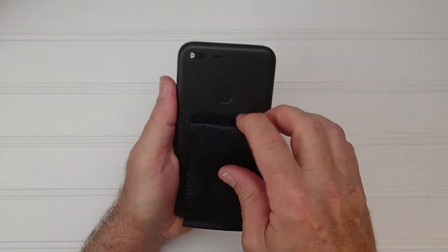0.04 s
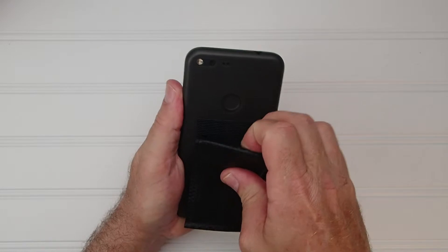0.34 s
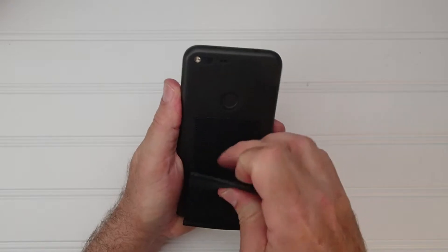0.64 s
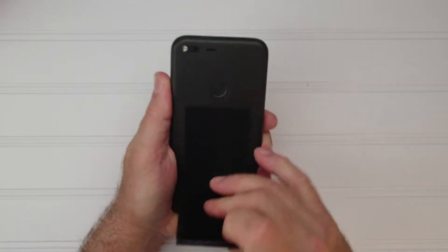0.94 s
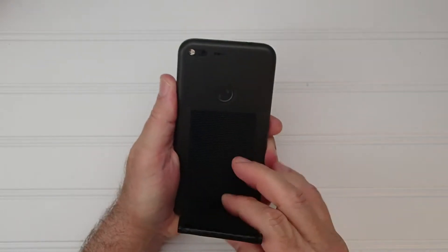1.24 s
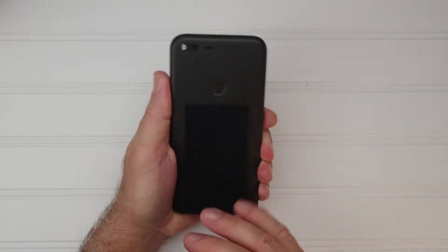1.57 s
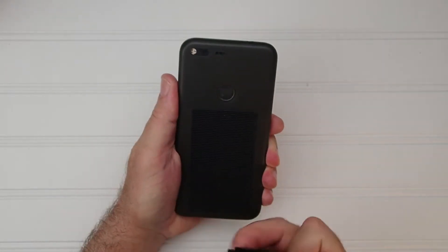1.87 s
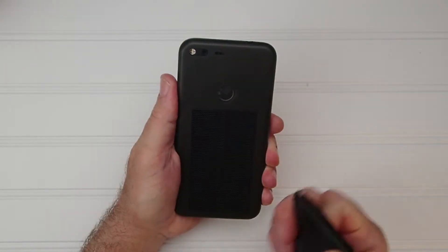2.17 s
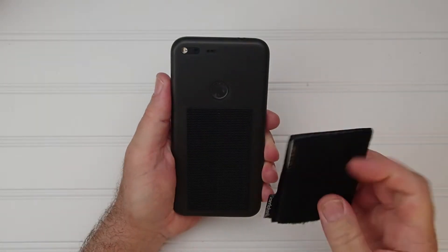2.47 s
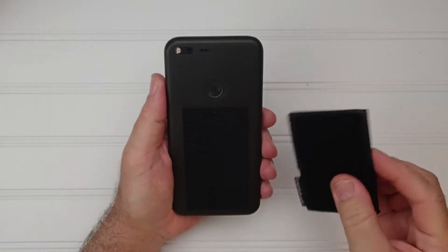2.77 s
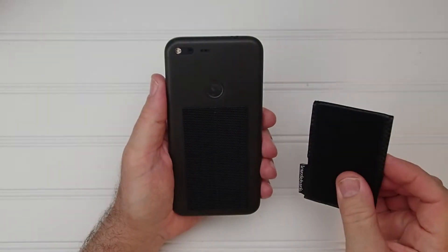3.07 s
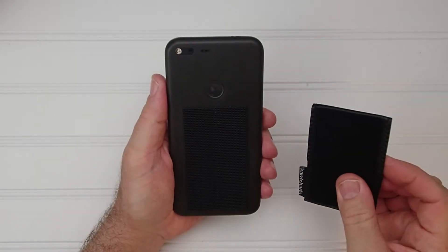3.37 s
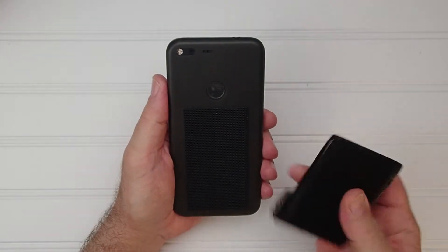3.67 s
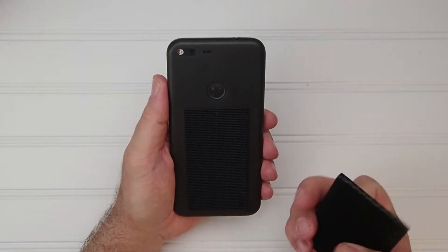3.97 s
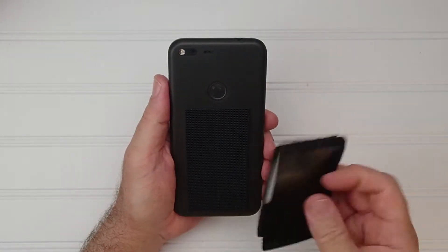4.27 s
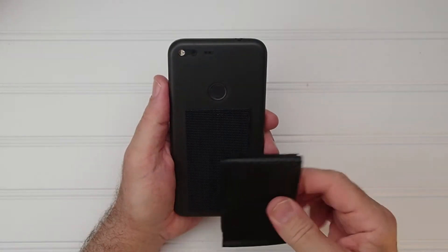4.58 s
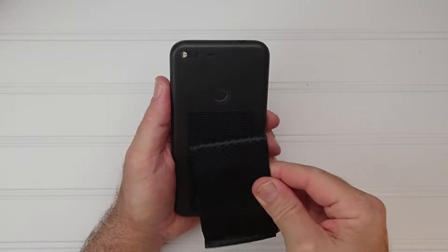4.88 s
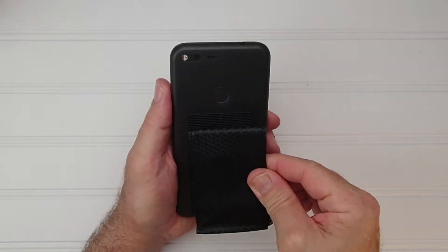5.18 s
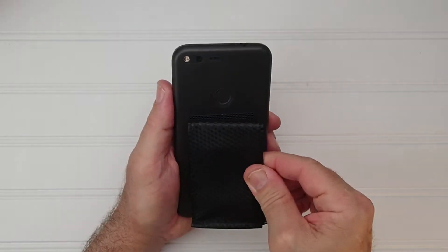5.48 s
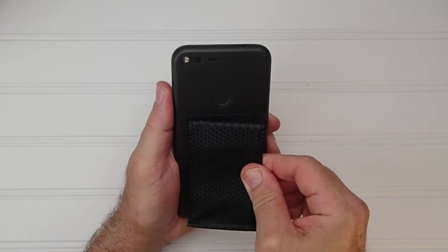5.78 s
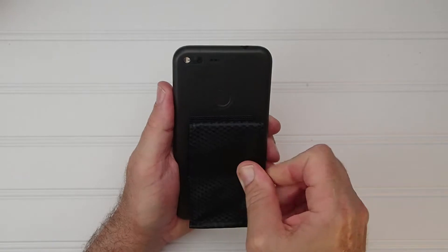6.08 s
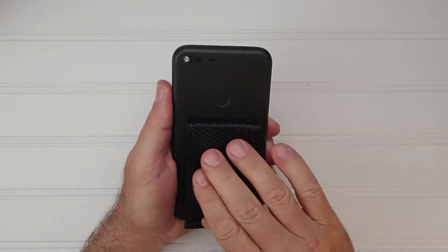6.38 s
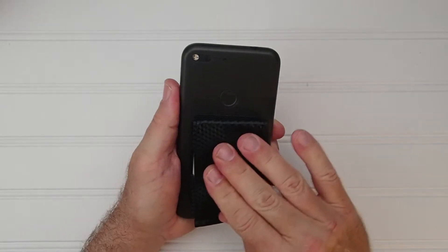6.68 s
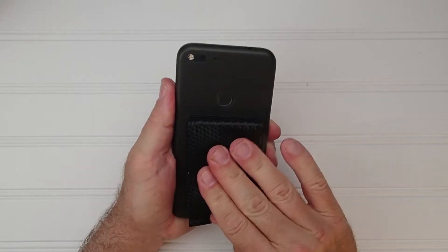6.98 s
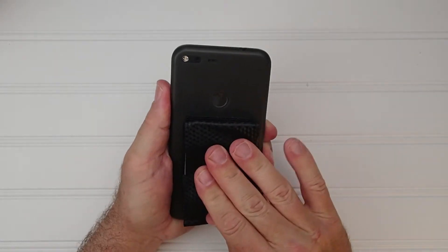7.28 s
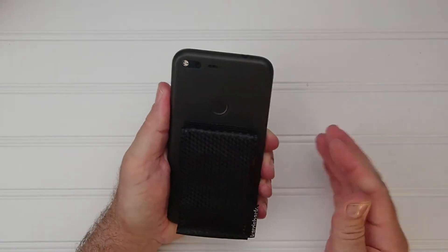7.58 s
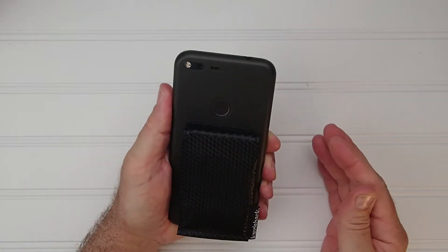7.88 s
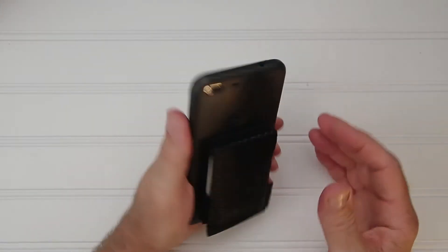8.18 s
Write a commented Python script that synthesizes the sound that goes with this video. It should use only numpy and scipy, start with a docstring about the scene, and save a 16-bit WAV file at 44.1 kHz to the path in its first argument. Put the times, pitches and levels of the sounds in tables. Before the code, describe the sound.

Sharp little snaps build into crackling, scratchy rips as a hook-and-loop pouch is pulled from a phone case, with one more short tear freeing it. The rest is much quieter: skin brushing on fabric, scattered fingernail ticks and, near the end, several crisp taps as the pouch is patted back on. The microphone is close, in a still room with a soft hiss and a barely audible fan.

```python
"""Peeling a pouch off a phone case

A fabric card pouch is peeled off a hook-and-loop patch, close by in a quiet room. Hooks snap free one
by one, then in rasping runs that shake the loose flap; a second rip frees the last corner. Fingers turn
the pouch over, press it back on and pat it down, with soft rubs, ticks and a low bump.
Behind it all are a steady hiss, the faint hum of a fan and one short train of very faint, high chirps."""
import sys
import numpy as np
from scipy import signal
from scipy.fft import rfft, irfft
from scipy.io import wavfile
from scipy.ndimage import uniform_filter1d, minimum_filter1d, map_coordinates

SR = 44100
rng = np.random.default_rng(int(sys.argv[2]) if len(sys.argv) > 2 else 0)


def master_out(mix):
    """Clip the mix to full scale and print it as 16-bit PCM to the path in sys.argv[1]."""
    frames = np.transpose(np.atleast_2d(mix))
    ceiling = np.clip(frames, -1, 1)
    pcm = np.round(ceiling * 32767).astype(np.int16)
    wavfile.write(sys.argv[1], SR, pcm)


N = 367353
T = np.arange(N) / SR

# Levels in the tables are relative. A "flap level" says how hard the flap sounds next to the treble.
# The hiss of the still room and microphone. Each row: frequency in Hz, level in dB.
AIR_TONE = [(25, -25.5), (60, -9.5), (140, -6), (240, -7), (380, -6), (600, -15.5), (1200, -15),
            (1900, -24.5), (2700, -39), (4200, -35), (5300, -21), (6500, -16.5), (9300, -15.5),
            (10500, -28)]
# How wide that hiss is. Each row: frequency in Hz, width in dB (left-right difference over shared part).
AIR_WIDTH = [(60, -1), (200, -2.5), (380, -4.5), (700, -1.5), (4400, -2), (8100, 2), (15000, 0.5)]
# The loudest hooks that snap free on their own. Each row: time in seconds, level in dB.
HOOK_SNAPS = [(.068, -27), (0.0694, -23.5), (0.077, -25.5), (.089, -19.5), (.096, -20), (.114, -20.5),
              (.1254, -23.5), (.127, -21), (0.147, -17.5), (.149, -19.5), (0.1711, -23), (0.1851, -20.5),
              (0.2086, -25.5), (.2204, -27), (0.2338, -18), (.281, -12.5), (0.3087, -23), (0.4966, -25),
              (0.6691, -16.5), (1.0175, -28), (1.05, -26), (1.3969, -22)]
# Pulls of the hand, each tearing a run of hooks loose. Each row: start, hardest moment and end in
# seconds, level at the hardest moment in dB, drop on either side of it in dB per second.
HAND_PULLS = [(0.252, .26, .268, -23, 120), (.286, .297, .303, -23.5, 120), (0.324, .366, 0.39, -22, 88.5),
              (.422, .43, 0.46, -23, 69), (.528, .592, .66, -20, 115), (0.686, .708, 0.77, -22.5, 160),
              (.784, .828, .879, -23, 130), (.888, .94, 1, -20, 130), (1.409, 1.475, 1.539, -24, 45)]
# The ring of a cracking hook. Each row: pitch in Hz, half width in Hz (wider dies sooner), level in dB.
HOOK_RING = [(4383, 460, -8.5), (5960, 320, 1), (6457, 180, -3), (6740, 1200, -3.5), (8700, 740, -8.5),
             (9050, 410, -6.5), (12100, 2200, -20.5)]
# The ring of the flap and case. Each row: pitch in Hz, half width in Hz, level in dB.
FLAP_RING = [(478, 70, -18.5), (651, 70, -15.5), (830, 100, -7), (981, 55, 3), (1232.4, 62, 2.5),
             (1425, 105, -0.5), (1618, 41, 2.5), (1732, 58, 1.5), (2012, 120, 2), (2396, 200, -1),
             (3916, 220, -3.5)]
# The crack and the flap, damped by a finger. Each row: pitch in Hz, half width in Hz, level in dB.
DAMPED_CRACK_RING = [(4370, 250, -10.5), (6400, 800, 4.5), (8700, 1500, -1.5), (12500, 2500, -16)]
DAMPED_FLAP_RING = [(950, 200, 1.5), (1600, 300, -1), (2120, 500, -2.5)]
# Spells of light finger contact. Each row: start in seconds, end in seconds, level in dB.
FINGER_HOLDS = [(1.05, 1.365, -54.5), (1.66, 2.3, -62), (3.761, 4.553, -62.5), (6.494, 6.814, -58.5)]
# Finger strokes over the fabric. Each row: middle and length in seconds, level in dB, flap level in dB.
FINGER_STROKES = [(1.703, 0.029, -55.5, -19), (1.967, 0.038, -55, -12), (2.08, 0.043, -57.5, -6),
                  (2.281, 0.046, -52, -8), (2.494, 0.082, -52.5, -13.5), (2.603, 0.044, -51.5, -16),
                  (2.727, .07, -56, -12.5), (3.647, 0.084, -53, -18), (3.867, 0.043, -57, -13.5),
                  (4.045, 0.041, -54, -14), (4.14, 0.025, -56.5, -15), (4.326, 0.04, -56.5, -14),
                  (4.812, 0.046, -59, -11), (6.016, 0.059, -53.5, -7.5), (6.38, 0.091, -57.5, -11.5),
                  (7.395, 0.079, -54.5, -12)]
# The hiss of skin on fabric. Each row: frequency in Hz, level in dB.
SKIN_TONE = [(1000, -44), (3000, -27), (4100, -14), (5000, -15), (6400, 0), (7500, -8.5), (9200, -6),
             (10500, -20.5), (12500, -17), (16000, -27)]
# Nails and pats on the pouch. Each row: time in seconds, level in dB, flap level in dB.
FINGER_TAPS = [(1.3113, -30, -9.5), (2.976, -36.5, -23), (3.553, -38.5, -9.5), (3.866, -46, -3),
               (3.941, -37, -9.5), (4.799, -44.5, -3), (6.022, -42, -3), (6.343, -24.5, -14),
               (6.709, -32, -21), (7.169, -44.5, -8), (7.3465, -44, -5), (7.387, -31.5, -8),
               (7.409, -30.5, -26), (7.542, -47.5, -15)]
# How wide the room's echo is. Each row: frequency in Hz, width in dB.
ECHO_WIDTH = [(300, -14.5), (700, -11.5), (1200, -10), (2200, -12.5), (4000, -13), (8000, 1), (15000, 2.5)]
# The balance of the two microphone openings. Each row: frequency in Hz, left minus right in dB.
MIC_BALANCE = [(700, -0.5), (1300, 0), (2400, -0.5), (4400, 1), (6500, -.5), (9000, 2), (15000, 2.5)]

PEEL_START_S, PEEL_END_S = .085, 1.05  # the first rip


def amp(db):
    """Turn decibels into a number to multiply by."""
    return 10 ** (np.asarray(db) / 20)


def unit(x):
    """Scale a signal to an average power of 1."""
    return x / np.sqrt(np.mean(x ** 2))


def colour(points):
    """Join (Hz, dB) points into a gain for every frequency."""
    hz, db = np.transpose(points)
    return amp(np.interp(np.log(np.arange(N // 2 + 1) * SR / N + 1), np.log(hz), db))


def wander(hz):
    """A random drift of size about 1, moving mostly slower than hz."""
    return unit(irfft(rfft(rng.standard_normal(N)) * colour([(hz, 0), (10 * hz, -90)]), N))


def between(start, end):
    """One from start to end, zero elsewhere."""
    return 1. * ((T > start) & (T < end))


def stereo_noise(width, gain=1):
    """Left and right noise whose difference follows a (Hz, dB) curve."""
    mid, side = rfft(rng.standard_normal((2, N))) * gain
    mid, side = irfft(mid, N), irfft(side * colour(width), N)
    return np.array([mid + side, mid - side]) / np.std(mid)


def convolve(x, response):
    """Make every sample of a sound set off a copy of the response."""
    return signal.oaconvolve(np.atleast_2d(x), np.atleast_2d(response), axes=1)[:, :N]


def ring(modes, size=4096):
    """How an object with these resonances rings after one click."""
    f = np.arange(size // 2 + 1) * SR / size
    power = sum(amp(db) ** 2 / (1 + ((f - hz) / width) ** 2) ** 2 for hz, width, db in modes)
    # this fold puts all the ringing after the click, none before
    cepstrum = irfft(np.log(power) / 2)
    cepstrum[1:size // 2] *= 2
    cepstrum[size // 2 + 1:] = 0
    return unit(irfft(np.exp(rfft(cepstrum)))) / np.sqrt(size)


def impulses(times, sizes):
    """Clicks at the given times."""
    return np.bincount(np.clip(np.round(times * SR).astype(int), 0, N - 1), sizes, N)


def scattered(per_s, vary_db):
    """Lone clicks at random moments, of size near 1."""
    return (rng.random(N) < per_s / SR) * amp(vary_db * rng.uniform(-1, 1, N))


def grains(per_s, spread_db, even_s):
    """A crackle of unequal clicks, its power evened out over even_s seconds."""
    chance, loudness, sign = rng.random(N), rng.exponential(size=N), rng.choice([-1, 1], N)
    clicks = (chance < per_s / SR) * amp(spread_db * np.minimum(loudness, 4)) * sign
    power = uniform_filter1d(clicks ** 2, int(even_s * SR))
    return clicks / np.sqrt(np.abs(power) + 1e-6)


def fan_and_air(hum_hz=365.4, hum_db=-74, air_db=-61):
    """A small fan hums, wavering slightly, over a steady hiss."""
    swell = 1 + .12 * wander(hz=14)
    hum = unit(swell * np.sin(2 * np.pi * hum_hz * T + .25 * wander(hz=9)))
    return amp(hum_db) * hum + amp(air_db) * stereo_noise(AIR_WIDTH, colour(AIR_TONE))


def hook_snaps(pull, stubborn_db=6, stray_db=-35, first_db=7, snap_s=.00057, drag_db=-7, drag_s=.0016):
    """Single hooks give way, each dragging a few neighbours with it."""
    times, db = np.transpose(HOOK_SNAPS)
    loudest = impulses(times, amp(db))
    stubborn = amp(stubborn_db) * pull * scattered(per_s=26, vary_db=1.5)
    strays = amp(stray_db) * between(PEEL_START_S, PEEL_END_S) * scattered(per_s=60, vary_db=4)
    # a run begins when the hook that held it back gives way
    starts, hardest, _, level, ease = np.transpose(HAND_PULLS)
    first = impulses(starts, amp(level - ease * np.abs(hardest - starts) + first_db))
    snaps = (loudest + stubborn + strays + first) * np.sqrt(snap_s * SR)
    dragged = convolve(snaps, np.exp(-T[:SR // 20] / drag_s)) / np.sqrt(drag_s * SR / 2)
    return snaps + amp(drag_db) * dragged * rng.standard_normal(N)


def shaken_pouch(releases, flap_free_s=.78, vary_db=1.5, low_hz=280):
    """Each hook cracks in the treble and shakes the flap and case, in a mix of its own."""
    # the flap booms more as it grows, until it hangs free
    flap_db = np.interp(T, [PEEL_START_S, flap_free_s], [-9, -.34])
    mix = amp(vary_db * rng.uniform(-1.2, 1, N))
    crack = convolve(releases * mix, ring(HOOK_RING))
    flap = convolve(releases / mix * amp(flap_db), ring(FLAP_RING))
    # something this small gives off no bass
    return signal.sosfilt(signal.butter(2, low_hz, "highpass", fs=SR, output="sos"), crack + flap)


def slackening(sound, taut_hz=6400, slack_hz=1880, start_db=5, fall_db_per_s=4):
    """As the stretched fabric goes slack, its high ring gives way to a lower one."""
    last_pull_end = HAND_PULLS[-1][2]
    taut_db = start_db - fall_db_per_s * np.minimum(T, last_pull_end)
    for hz, sharpness, db in ((taut_hz, 7, taut_db), (slack_hz, 4, -1.2 * taut_db)):
        band = signal.lfilter(*signal.iirpeak(hz, sharpness, fs=SR), sound)
        sound = sound + (amp(db) - 1) * band
    return sound


def tearing(row_hz=115, row_drop_db=9, crackle_db=-24):
    """Each pull builds and eases off, tearing hooks loose singly and in dense runs."""
    pull = sum(amp(level - ease * np.abs(T - hardest)) * between(start, end)
               for start, hardest, end, level, ease in HAND_PULLS)
    snaps = hook_snaps(pull)
    # within a run the hooks go row by row: a burst, then a lull
    row_phase = np.cumsum(row_hz * amp(3 * wander(hz=59.3))) / SR % 1
    bursts = unit(amp(-row_drop_db * row_phase))
    runs = pull * bursts * grains(per_s=1400, spread_db=3, even_s=.016)
    # stretched loops crackle faintly around each run
    stretch = uniform_filter1d(pull, int(.06 * SR))
    crackle = amp(crackle_db) * stretch * grains(per_s=600, spread_db=2.5, even_s=.025)
    return slackening(shaken_pouch(snaps + runs + crackle))


def table_echo(x, lag_s=.000612, move_s=.000014, mic_s=.000011, share=.58, far_s=.00225, far_share=.31):
    """Sound bounces off the table by a path that shifts with the hands, then off a farther surface."""
    lag = lag_s + move_s * wander(hz=24.7)
    bounce = [map_coordinates(x[0], [(T - lag - mic_s * wander(hz=40)) * SR], order=3) for _ in "LR"]
    near = x + share * np.array(bounce)
    f = np.arange(N // 2 + 1) * SR / N
    far = 1 + far_share * np.exp(-2j * np.pi * f * far_s) * colour([(2500, 0), (6000, -7.5)])
    return irfft(rfft(near) * far, N) / np.sqrt(1 + share ** 2 + far_share ** 2)


def room_echo(x):
    """Hands and nearby things scatter the sound briefly; the walls add a soft tail."""
    # each: level in dB, seconds to fade by 60 dB, tone as (Hz, dB) points
    nearby = (-8, .036, [(1500, .5), (9000, -3)])
    walls = (-18, .45, [(1500, 3), (3000, 1), (7000, -1), (14000, -11)])
    t, response = T[:SR], 0
    for db, fade_s, tone in (nearby, walls):
        fade = np.exp(-np.log(1000) * t / fade_s) * (t > .001)
        tail = stereo_noise(ECHO_WIDTH, colour(tone))[:, :SR] * fade
        response = response + amp(db) * unit(tail) / np.sqrt(SR)
    return x + convolve(x, response)


def rubbing(catch_db=2.2, fidget_db=1.6, grip_ease_s=.05, grip_flap_db=-12):
    """Skin catches on the weave in thousands of tiny slips; each stroke swells unevenly and fades."""
    slips = grains(per_s=3000, spread_db=2, even_s=.064) * unit(amp(catch_db * wander(hz=70)))
    middle, length, db, flap_db = np.transpose(FINGER_STROKES)
    t = T[::20]
    strokes = np.exp(-np.minimum(2 * ((t[:, None] - middle) / length) ** 2, 20))
    hiss_level, flap_level = (np.interp(T, t, strokes @ amp(level)) for level in (db, db + flap_db))
    # between strokes the fingers keep shifting their grip
    held = sum(amp(level) * between(start, end) for start, end, level in FINGER_HOLDS)
    grip = uniform_filter1d(held, int(grip_ease_s * SR)) * unit(amp(fidget_db * wander(hz=11)))
    skin = irfft(rfft(slips * (hiss_level + grip)) * unit(colour(SKIN_TONE)), N)
    flap = convolve(slips * (flap_level + amp(grip_flap_db) * grip), ring(DAMPED_FLAP_RING))
    return skin + flap


def ticks(contact_s=.00015, crunch_db=-3, crunch_s=.0044, faint_db=-47.5, faint_flap_db=-9):
    """A nail or pat makes a sharp contact, then the fibres settle for a few milliseconds."""
    crunch = amp(crunch_db) * rng.standard_normal(N) / np.sqrt(crunch_s * SR / 2)
    settle = np.exp(-T[:SR // 10] / crunch_s)
    times, db, flap_db = np.transpose(FINGER_TAPS)
    # lesser ticks come at random while the fingers hold the pouch
    holding = sum(between(start, end) for start, end, _ in FINGER_HOLDS)
    faint = amp(faint_db) * scattered(per_s=7, vary_db=2.5) * holding
    crack = impulses(times, amp(db)) + faint
    flap = impulses(times, amp(db + flap_db)) + amp(faint_flap_db) * faint
    out = 0
    for clicks, modes in ((crack, DAMPED_CRACK_RING), (flap, DAMPED_FLAP_RING)):
        hits = clicks * np.sqrt(contact_s * SR)
        out = out + convolve(hits + convolve(hits, settle) * crunch, ring(modes))
    return out


def faint_chirps(first_s=2.835, gap_s=.084, note_s=.04, low_hz=3480, high_hz=4850, arch_hz=450):
    """Fifteen very faint, high chirps that rise and fall; one in five is higher."""
    place = np.linspace(-1, 1, int(note_s * SR))
    out = np.zeros(N)
    for note in range(15):
        top_hz, db = (high_hz, -77) if note % 5 == 3 else (low_hz, -80)
        start = int((first_s + note * gap_s) * SR) - len(place) // 2
        phase = 2 * np.pi * np.cumsum(top_hz - arch_hz * place ** 2) / SR
        out[start:start + len(place)] += amp(db) * (1 - place ** 2) * np.sin(phase)
    return out


def bump(db=-63.5):
    """A soft low rumble as the pouch is pressed back on."""
    tone = colour([(15, -6), (35, 0), (70, 6), (130, -22), (400, -70)])
    rumble = stereo_noise(width=[(20, -12), (200, -14)], gain=tone)
    press = np.interp(T, [6, 6.04, 6.17, 6.28], [0, 1, 1, 0])
    return amp(db) * rumble * press


def scene(tear_db=-1, rub_db=-1):
    """Hands work the pouch above a table in a quiet room, with a fan and faint chirps behind."""
    hands = table_echo(amp(tear_db) * tearing() + ticks()) + amp(rub_db) * rubbing()
    balance = np.sqrt(colour(MIC_BALANCE))
    heard = irfft(rfft(room_echo(hands)) * np.array([balance, 1 / balance]), N)
    return heard + bump() + faint_chirps() + fan_and_air()


def limiter(x, ceiling=.35, hold_s=.002):
    """Turn the sound down for a moment wherever a peak would pass the ceiling."""
    hold = int(hold_s * SR)
    gain = ceiling / np.maximum(np.abs(x).max(axis=0), ceiling)
    return x * uniform_filter1d(minimum_filter1d(gain, hold), hold)


def record(dry, fade_from_s=7.69, silent_s=7.885, top_hz=16000):
    """Hold down the loudest peaks, fade out at the end and cut the highest treble."""
    fade = np.sqrt(np.clip((silent_s - T) / (silent_s - fade_from_s), 0, 1))
    treble_cut = signal.ellip(10, .2, 80, top_hz, fs=SR, output="sos")
    return signal.sosfilt(treble_cut, limiter(dry) * fade)


dry = scene()
out = record(dry)
master_out(out)
```